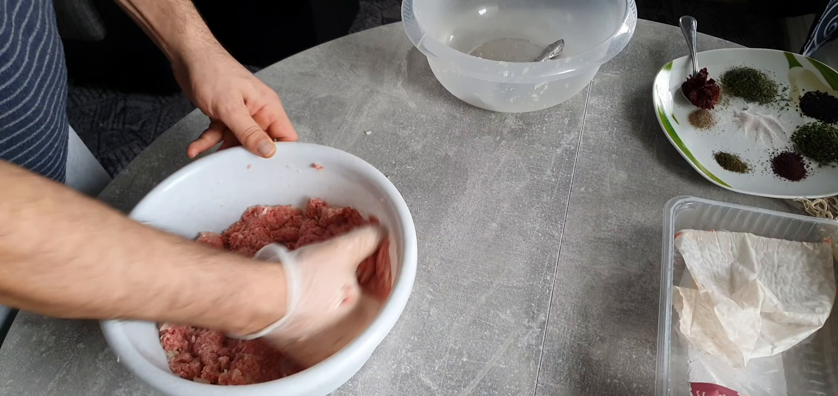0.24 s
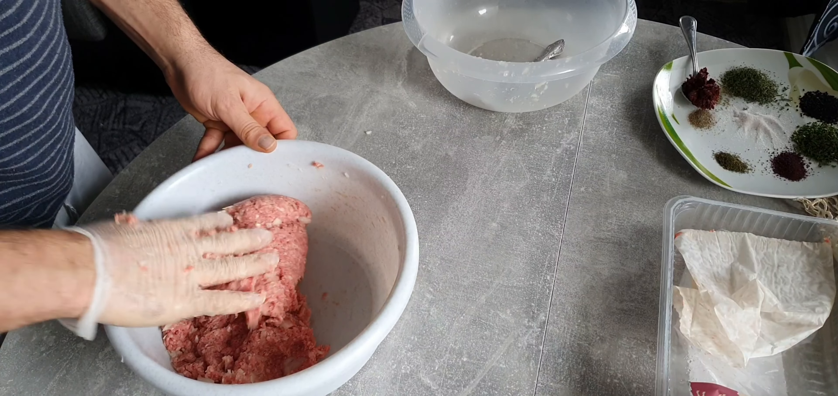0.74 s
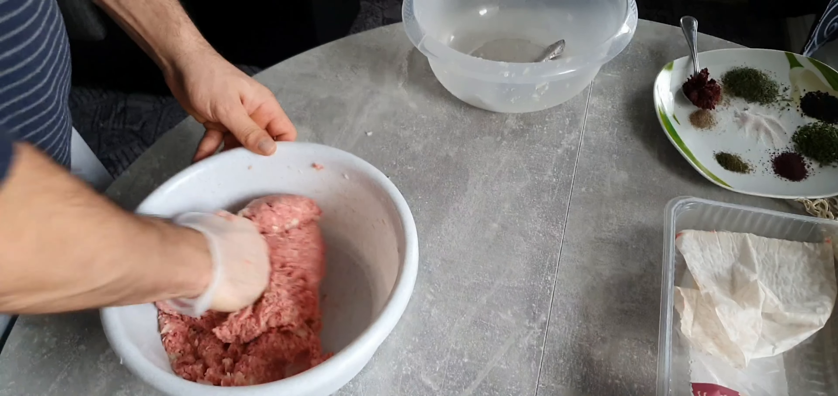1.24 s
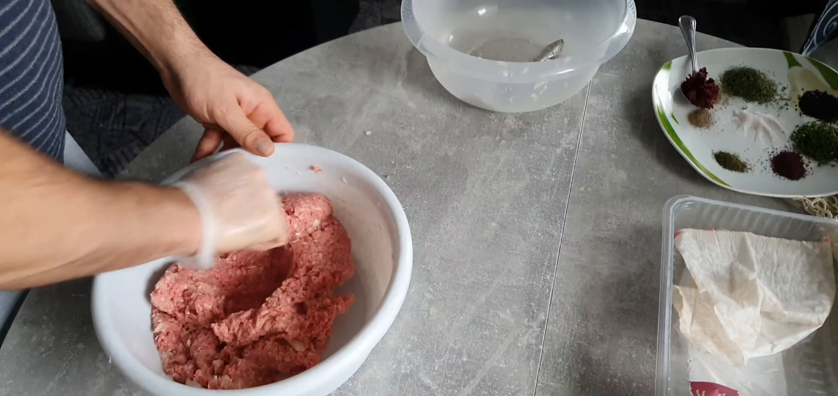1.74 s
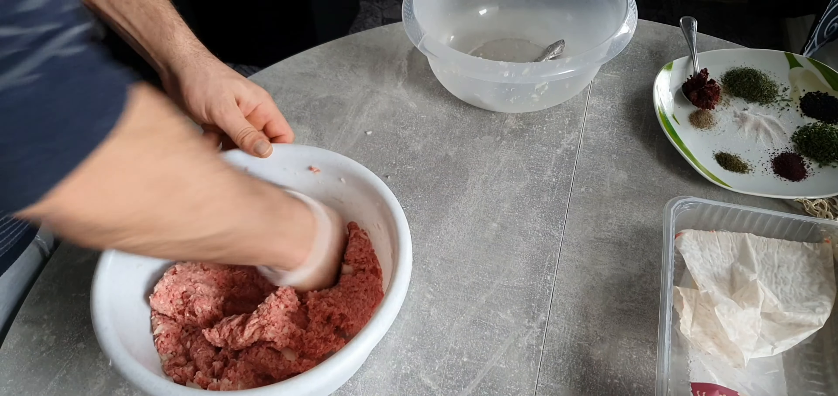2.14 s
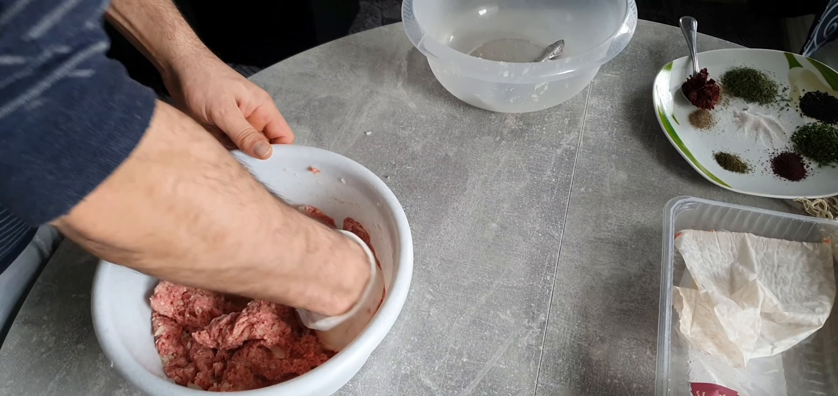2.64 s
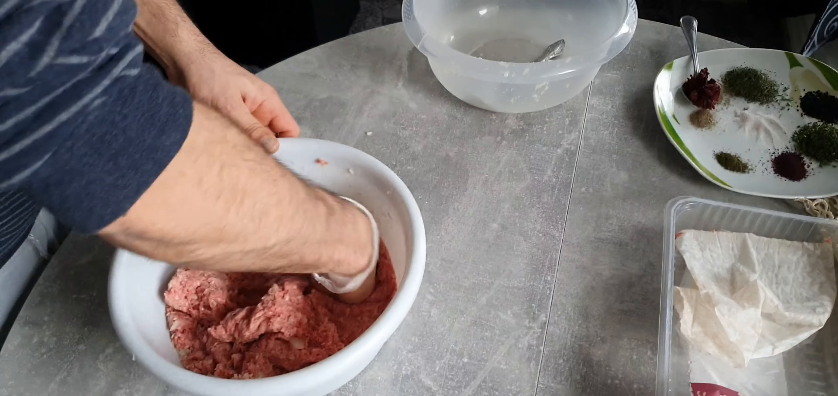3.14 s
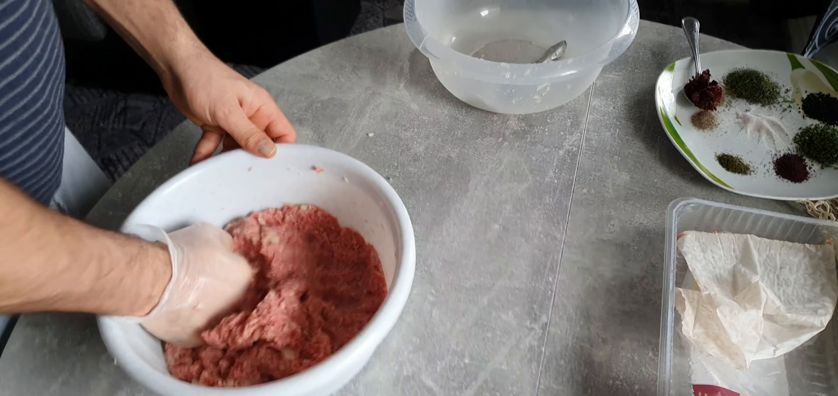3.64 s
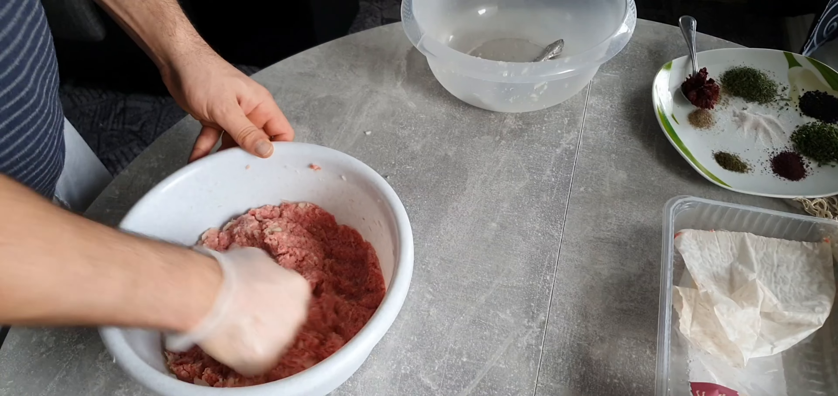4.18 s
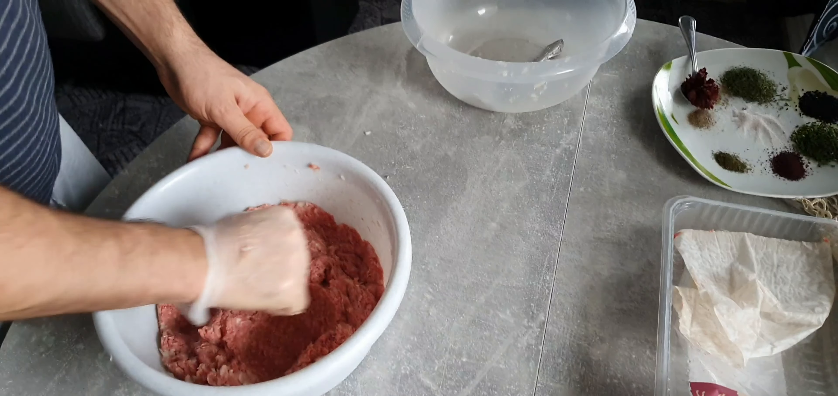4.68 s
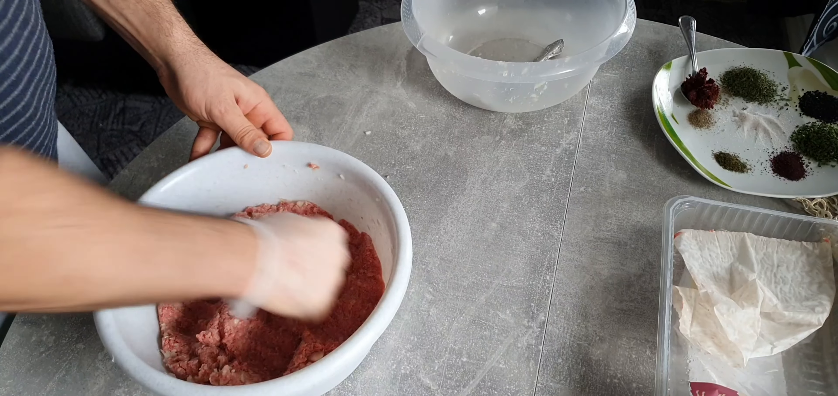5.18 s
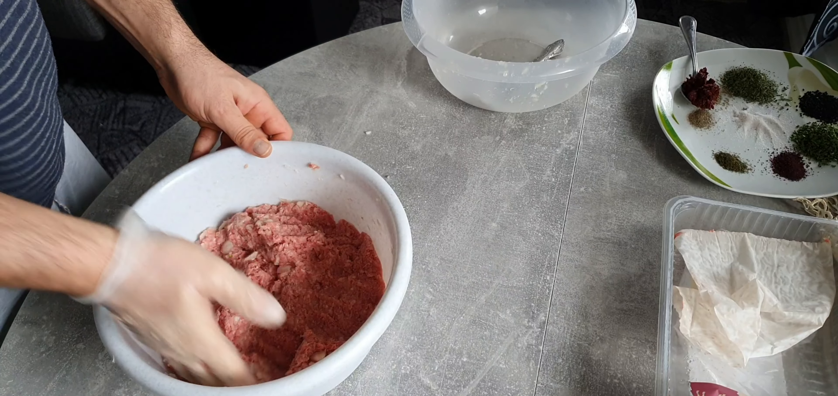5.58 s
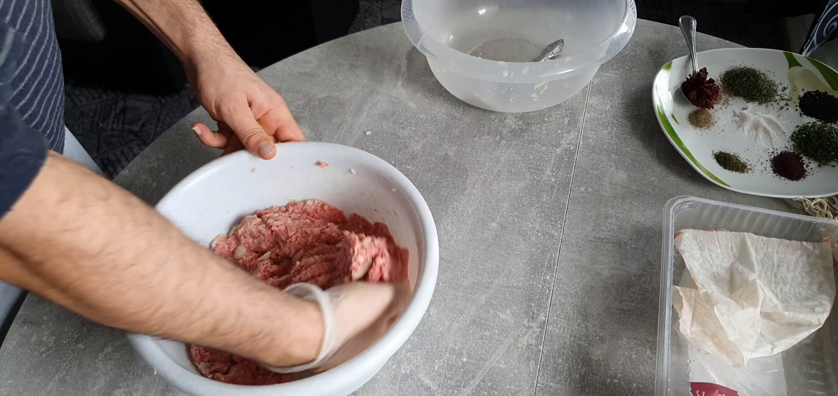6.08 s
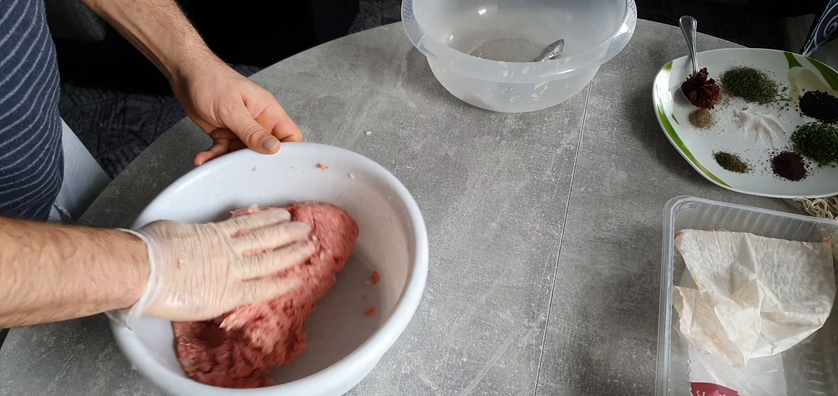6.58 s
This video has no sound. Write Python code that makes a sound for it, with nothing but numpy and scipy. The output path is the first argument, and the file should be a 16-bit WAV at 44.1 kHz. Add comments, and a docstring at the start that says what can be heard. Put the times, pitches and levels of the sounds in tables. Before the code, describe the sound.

A gloved hand kneads raw minced meat in a plastic bowl, wet squelches and sticky crackles broken by dull, boomy punches against the table.

```python
"""Kitchen table: a gloved hand kneads raw minced meat in a plastic bowl.
Scoops, peels and plunges gate three click textures (smear, squelch, glove crackle); scoops also scrape the wall.
Bursting pockets ring for about a cycle; punches excite bowl and table modes that boom.
Slaps are short dull noise; squirts are air puffs through a resonant gap. The arm rocks the table;
faint room noise runs throughout and a small kitchen rings briefly."""
import sys
import numpy as np
from scipy import signal
from scipy.fft import rfft, irfft, next_fast_len
from scipy.io import wavfile
from scipy.ndimage import uniform_filter1d

SR = 44100
rng = np.random.default_rng(int(sys.argv[2]) if len(sys.argv) > 2 else 0)


def transcribe(u):
    """Save the signal u as a 16-bit wav file named by the first command-line argument.

    u: samples, shape (n,) or (channels, n), limited to [-1, 1]; the rate is SR.
    q: integer samples, one column per channel.
    """
    v = np.clip(np.atleast_2d(u).T, -1, 1)
    q = np.round(v * 32767).astype(np.int16)
    wavfile.write(sys.argv[1], SR, q)


N = 300762
TIME = np.arange(N) / SR
TOP_HZ = 15700
SIDES = np.array([[1], [-1]])  # opposite motion, left and right


def undb(db):
    """Decibels to gain."""
    return 10 ** (np.asarray(db) / 20)


def unit(x):
    """Scale to an rms of 1."""
    return x / np.sqrt(np.mean(x ** 2))


def add(track, start_s, sound):
    """Mix a sound into a track at a time."""
    start = max(int(start_s * SR), 0)
    track[start:start + len(sound)] += sound[:N - start]


def on_log_axis(points, hz):
    """Read (Hz, value) points at any frequency."""
    known_hz, values = np.transpose(points)
    return np.interp(np.log(hz + 1), np.log(known_hz), values)


def colour(x, points):
    """Minimum-phase filter with the given spectrum; white noise keeps its power."""
    size = next_fast_len(2 * N)
    size += size % 2
    gain = unit(undb(on_log_axis(points, np.fft.rfftfreq(size, 1 / SR))))
    cepstrum = irfft(np.log(gain))
    # fold onto positive time: causal
    cepstrum[1:size // 2] *= 2
    cepstrum[size // 2 + 1:] = 0
    response = np.exp(rfft(cepstrum))
    return irfft(rfft(x, size) * response)[..., :N]


def resonate(x, hz, q):
    """One resonance with a gain of 1 at its centre."""
    hz = min(hz, TOP_HZ)
    b, a = signal.iirpeak(hz, max(q, hz / TOP_HZ), fs=SR)
    return signal.lfilter(b, a, x)


def walk(rate_hz):
    """Smooth random wandering with a spread near 1."""
    return 1.2 * np.interp(TIME * rate_hz, np.arange(1000), rng.standard_normal(1000))


def clicks(rate_hz, spread_db):
    """Random clicks of uneven size and random sign, levelled to an rms near 1 over about 0.11 s."""
    chance = rng.random(N)
    size = np.minimum(rng.exponential(size=N), 5)
    train = (chance < rate_hz / SR) * undb(spread_db * size) * rng.choice([-1, 1], N)
    return train / np.sqrt(np.abs(uniform_filter1d(train ** 2, size=5000)) + 1e-9)


def crackle(rate_hz, spread_db, q, snap_share, patchy_db):
    """Tiny films break: most ring a cavity, some only snap; each cavity's level wanders as the meat deforms."""
    rings = np.zeros(N)
    for hz in np.geomspace(550, 14000, 18):
        level = undb(patchy_db * walk(rate_hz=28))
        breaks = clicks(rate_hz * np.sqrt(hz / TOP_HZ), spread_db)
        rings += level * resonate(breaks, hz, q)
    return unit(unit(rings) + snap_share * clicks(rate_hz, spread_db))


def stroke(start_s, rise_s, hold_s, sag_db_per_s, rest_db=-25, release_db_per_s=255):
    """Gain of one movement: swell from rest, slackening hold, release when the hand stops."""
    t = TIME - start_s
    swell_db = rest_db * np.clip(1 - t / rise_s, 0, None) ** 2
    sag_db = sag_db_per_s * np.maximum(t - rise_s, 0)
    release_db = release_db_per_s * np.maximum(t - rise_s - hold_s, 0)
    return (t >= 0) * undb(np.maximum(swell_db - sag_db - release_db, -120))


# hand scoops meat along the bowl wall: start t/s, rise t/s, hold t/s, relative level/dB
SCOOP_STROKES = [(0.0, 0.005, 0.24, -48), (0.223, 0.062, 0.32, -56.5), (3.557, 0.027, 0.23, -50),
                 (5.54, 0.24, 0.23, -51.5), (5.944, 0.04, 0.17, -60), (6.168, 0.087, 0.045, -55.5),
                 (6.521, 0.088, 0.041, -55)]


def scoops(smear_db=-5, glove_db=-6, scrape_db=-7, sag_db_per_s=20.5):
    """Power of smear, squelch, glove and scrape: scooping alone scrapes the wall."""
    power = np.zeros((4, N))
    for start_s, rise_s, hold_s, db in SCOOP_STROKES:
        mix = undb(db + np.array([smear_db, 0, glove_db, scrape_db]))
        power += np.outer(mix, stroke(start_s, rise_s, hold_s, sag_db_per_s)) ** 2
    return power


# sticky glove peels off: start t/s, rise t/s, hold t/s, relative level/dB, glove crackle re that/dB
PEEL_STROKES = [(0.033, 0.076, 0.028, -53, 6), (0.247, 0.31, 0.22, -66, 7.5), (1.243, .12, 0.078, -55, 5),
                (1.482, 0.047, 0.064, -62, -5), (1.783, 0.13, 0.15, -52, -3),
                (2.122, 0.026, 0.066, -52, -1.5), (2.7, 0.021, 0.028, -54, -1),
                (3.287, 0.041, 0.042, -58, 2.5), (3.583, 0.059, 0.14, -60.5, 10.5),
                (3.915, 0.043, 0.021, -44.5, -11), (4.148, 0.13, 0.15, -59, 1),
                (4.468, 0.11, 0.044, -64.5, 3), (4.918, 0.026, 0.014, -63, 8.5),
                (5.069, 0.068, 0.062, -56.5, -0.5), (5.574, 0.016, 0.26, -69.5, 8.5),
                (6.312, 0.17, 0.43, -64.5, 6)]


def peels(smear_db=-15, sag_db_per_s=29.5):
    """Power of smear, squelch, glove and scrape: peeling films crackle, with little smear."""
    power = np.zeros((4, N))
    for start_s, rise_s, hold_s, db, crackle_db in PEEL_STROKES:
        mix = undb(db + np.array([smear_db, 0, crackle_db]))
        power[:3] += np.outer(mix, stroke(start_s, rise_s, hold_s, sag_db_per_s)) ** 2
    return power


# fist sinks into the meat: start t/s, rise t/s, hold t/s, relative level/dB, wetness re that/dB
PLUNGE_STROKES = [(1.108, 0.09, 0.28, -50, -2.5), (1.611, 0.024, 0.14, -43.5, -11.5),
                  (2.265, 0.013, 0.018, -62.5, -21), (2.391, 0.1, 0.11, -60.5, 7),
                  (2.754, 0.0091, 0.017, -63, 9.5), (2.997, 0.049, 0.14, -44.5, -3.5),
                  (3.573, 0.052, 0.17, -48, -7.5), (4.016, 0.01, 0.28, -51.5, -20),
                  (4.544, 0.047, 0.046, -46.5, -8.5), (4.792, 0.13, 0.027, -59.5, 4),
                  (5.278, .02, 0.042, -57, -3)]


def plunges(glove_db=-3, sag_db_per_s=77.5):
    """Power of smear, squelch, glove and scrape: displaced meat mostly smears; wetness adds crackle."""
    power = np.zeros((4, N))
    for start_s, rise_s, hold_s, db, wet_db in PLUNGE_STROKES:
        mix = undb(db + np.array([0, wet_db, wet_db + glove_db]))
        power[:3] += np.outer(mix, stroke(start_s, rise_s, hold_s, sag_db_per_s)) ** 2
    return power


# spectra of meat smear, wet squelch, glove crackle: f/Hz, relative level/dB
SMEAR_SPECTRUM = [(90, -26), (170, 1), (300, 7), (500, 2), (750, -5.5), (1200, -13), (3000, -46)]
SQUELCH_SPECTRUM = [(300, -12), (650, -8), (1100, 1), (1700, 2.5), (2700, 1), (4000, -1), (6000, -13.5),
                    (12000, -43)]
GLOVE_SPECTRUM = [(1500, -5), (3500, 0), (5500, 0), (6600, -3), (7700, -10), (10000, -5.5), (13000, -6),
                  (15500, -15.5)]


def kneading(settling_db=-83.5, scrape_hz=970, scrape_q=1.95):
    """Meat smears and squelches, the glove peels and the scraped wall rings, gated by the strokes."""
    power = scoops() + peels() + plunges()
    power[:3] += undb(settling_db) ** 2  # faint crackle between strokes
    slip_db = 1.35 * walk(rate_hz=70)  # glove sticks and lets go in quick jerks
    smear_gain, squelch_gain, glove_gain, scrape_gain = np.sqrt(power) * undb(slip_db)

    smear = colour(clicks(rate_hz=600, spread_db=3.5), SMEAR_SPECTRUM)
    squelch = crackle(rate_hz=380, spread_db=2.5, q=2.95, snap_share=1.0, patchy_db=2.0)
    squelch = undb(-2.55) * colour(squelch, SQUELCH_SPECTRUM)
    glove = crackle(rate_hz=970, spread_db=5.0, q=3.0, snap_share=2.2, patchy_db=9.0)
    glove = colour(glove, GLOVE_SPECTRUM)
    scrape = unit(resonate(clicks(rate_hz=350, spread_db=-1.0), scrape_hz, scrape_q))
    return smear * smear_gain + squelch * squelch_gain + glove * glove_gain + scrape * scrape_gain


# arm leans on the bowl: start t/s, rise t/s, hold t/s, relative level/dB
LEAN_STROKES = [(0.0, .02, 0.57, -51), (0.7, .03, 0.19, -56), (1.123, 0.032, 0.92, -45.5),
                (2.112, 0.18, 0.59, -48.5), (2.984, 0.032, 0.49, -49.5), (3.546, 0.064, 0.55, -42),
                (4.15, 0.054, 0.272, -49), (4.487, .08, 0.37, -51), (4.864, 0.049, 0.42, -52),
                (5.457, 0.28, 0.49, -54), (6.145, 0.17, 0.13, -69), (6.437, 0.076, 0.24, -60)]
# spectrum of the rocking table: f/Hz, relative level/dB
ROCKING_SPECTRUM = [(20, -33.5), (40, -14), (55, 0.5), (69, 1), (88, -9), (125, -13), (170, -25.5),
                    (300, -25.5), (700, -66)]


def pressing(sag_db_per_s=5.5, tilt_db=-6.5):
    """The leaning arm rocks the table in small slips; the two ends of the top swing partly apart."""
    weight = np.zeros(N)
    for start_s, rise_s, hold_s, db in LEAN_STROKES:
        lean = undb(db) * stroke(start_s, rise_s, hold_s, sag_db_per_s)
        weight = np.maximum(weight, lean)
    slips = np.array([clicks(rate_hz=400, spread_db=3.5) for _ in range(2)])
    heave, tilt = colour(slips, ROCKING_SPECTRUM)
    rock = heave + undb(tilt_db) * tilt * SIDES
    # the arm leans steadily: level over about 0.09 s
    rock /= np.sqrt(uniform_filter1d(np.mean(rock ** 2, axis=0), size=4000) + 1e-6)
    return rock * weight


# room noise spectrum: f/Hz, relative level/dB
ROOM_TONE_SPECTRUM = [(20, 5.5), (100, 2), (160, -3), (260, -6), (400, -14.5), (700, -22), (2400, -26),
                      (5000, -42.5), (15000, -61)]


def room_tone(level_db=-77):
    """Faint steady noise of the kitchen, independent left and right."""
    return undb(level_db) * colour(rng.standard_normal((2, N)), ROOM_TONE_SPECTRUM)


# bursting air pockets: t/s, relative ring level/dB, f/Hz, relative snap level/dB
POCKET_BURSTS = [(0.0104, -34.5, 2380, -81), (0.2141, -33.5, 1260, -79), (0.4401, -26.5, 2290, -62),
                 (1.1627, -52, 940, -43.5), (1.388, -46.5, 5070, -48.5), (1.5646, -41, 2350, -42),
                 (1.6429, -24, 1005, -49), (2.16, -42, 1530, -57), (2.7212, -47, 4560, -46),
                 (3.0487, -23.5, 2310, -44.5), (3.0587, -31, 1550, -43), (3.1177, -46, 1430, -46),
                 (3.3191, -47, 1620, -52.5), (3.358, -26, 3160, -48), (3.9976, -30, 1820, -42.5),
                 (4.0418, -27.5, 1570, -61), (4.5672, -37.5, 1400, -49.5), (4.9695, -49, 4100, -45.5),
                 (5.9132, -36, 1200, -50.5), (6.2853, -44, 1970, -57), (6.388, -47, 1110, -64),
                 (6.6989, -41.5, 2120, -63)]
# spectrum of a snapping film: f/Hz, relative level/dB
SNAP_SPECTRUM = [(300, 5), (900, -13), (3000, 6), (6500, 1), (13000, -14), (15500, -24)]


def pops(cycles=1.0, snap_s=0.00083):
    """A film snaps and the opening pocket rings for about one cycle."""
    rings, snaps = np.zeros((2, N))
    t = TIME[:SR // 20]
    for start_s, db, hz, snap_db in POCKET_BURSTS:
        ring = np.exp(-t * hz / cycles) * np.sin(2 * np.pi * hz * t)
        add(rings, start_s, undb(db + 2.0) * ring)
        snap = np.exp(-t / snap_s) * rng.standard_normal(len(t))
        add(snaps, start_s, undb(snap_db + 13) * snap)
    return rings + colour(snaps, SNAP_SPECTRUM)


# punches that reach the table: t/s, relative level/dB, contact time constant/ms
TABLE_PUNCHES = [(0.023, -39.5, 0.56), (0.731, -32.5, 4.4), (.757, -24, 5.8), (0.884, -44.5, 4.5),
                 (1.163, -32.5, 0.62), (1.644, -25, 0.6), (2.49, -32.5, 1), (3.019, -40.5, 0.37),
                 (3.058, -24, 0.85), (3.576, -35.5, 0.9), (4.042, -35, 0.55), (4.587, -28.5, 1.16),
                 (4.888, -27.5, 1.23), (5.293, -66, 1.3)]
# modes of loaded bowl on table: nominal f/Hz, nominal level/dB, t60/s
BOWL_TABLE_MODES = [(52, -10.5, 0.61), (65.77, 2.5, 0.33), (115.5, -2.5, 0.27), (127.5, -1, 0.52),
                    (160, -8.5, 0.54), (208.8, -14.5, 0.49), (253.4, -3, 0.19), (293, 1.5, 0.27),
                    (371, -6, 0.42), (487, -9.5, 0.066), (558, -7.5, 0.32), (689, -7, 0.3), (760, -32, .13),
                    (1010, -14, .1)]


def punches(table_hz=90, place_db=2.0, detune=0.037):
    """The meat cushions each blow: the longer the contact, the fewer high modes ring."""
    out, t = np.zeros(N), TIME[:SR // 2]
    hz, mode_db, t60_s = np.transpose(BOWL_TABLE_MODES)
    signs = np.where(hz < table_hz, -1, 1)  # table sags while the bowl rebounds
    loading = np.minimum(hz / 300, 1)  # the lump shifts wall modes more than table modes
    for start_s, db, contact_ms in TABLE_PUNCHES:
        place, load = loading * rng.standard_normal((2, len(hz)))
        gains = signs * undb(mode_db + place_db * place)
        gains *= np.where(hz > 180, rng.choice([-1, 1], len(hz)), 1)  # wall swings either way
        poles = 2j * np.pi * hz * (1 + detune * load) - np.log(1000) / t60_s
        ring = gains @ np.exp(np.outer(poles, t)).imag
        push = t * np.exp(-t * 1000 / contact_ms)
        blow = signal.fftconvolve(ring, push / push.sum())[:len(t)]
        add(out, start_s, undb(db) * blow)
    return out


# wet slaps of meat on the bowl wall: t/s, relative level/dB
WALL_SLAPS = [(1.162, -30.5), (1.642, -23.5), (3.014, -39.5), (3.058, -26), (3.576, -36), (4.039, -30),
              (4.588, -30.5), (5.291, -46)]
# slap spectrum: f/Hz, relative level/dB
SLAP_SPECTRUM = [(100, -29), (280, 5.5), (600, 2), (1100, -6), (2500, -8), (6000, -17), (15000, -58)]


def slaps(decay_s=0.0085):
    """Meat lands flat on the plastic: a short, dull splat of decaying noise."""
    out, t = np.zeros(N), TIME[:SR // 10]
    for start_s, db in WALL_SLAPS:
        splat = np.exp(-t / decay_s) * rng.standard_normal(len(t))
        add(out, start_s, undb(db - 5.0) * splat)
    return colour(out, SLAP_SPECTRUM)


# air squeezed from under the fist: start t/s, length t/s, relative level/dB, gap f/Hz, spray re gap/dB
AIR_SQUIRTS = [(1.563, 0.022, -39, 2700, 2.5), (1.583, 0.034, -30.5, 2730, -14.5),
               (1.607, 0.019, -44, 3050, -20), (3.954, 0.012, -41, 1610, -28),
               (3.991, 0.0094, -45.5, 3060, -5), (4.565, 0.009, -42, 1380, -16),
               (5.121, 0.017, -58, 1610, -24)]


def squirts(flutter_hz=600, gap_q=1.8, spray_hz=10200, hollow_hz=1100):
    """Air sputters through a wet gap in quick, uneven puffs that ring the gap and spray."""
    out = np.zeros(N)
    puffs = clicks(flutter_hz, spread_db=7.0) + 0.92 * rng.standard_normal(N)
    for start_s, length_s, db, gap_hz, spray_db in AIR_SQUIRTS:
        air = puffs[int(start_s * SR):int((start_s + length_s) * SR)]
        gap = unit(resonate(air, gap_hz, gap_q))
        spray = undb(spray_db) * unit(resonate(air, spray_hz, q=1.7))
        hollow = undb(-12.0) * unit(resonate(air, hollow_hz, q=1.9))  # under the fist
        window = signal.windows.tukey(len(air), .2)
        add(out, start_s, undb(db) * (gap + spray + hollow) * window)
    return out


# kitchen decay: f/Hz, t60/s
KITCHEN_DECAY = [(100, 0.58), (700, 0.27), (2000, 0.35), (5000, 0.2), (14000, 0.22)]


def echoes(early_db=-3, early_s=.006, onset_s=.004):
    """Left and right response of the kitchen: bowl and table answer first, the walls later."""
    t = TIME[:2 ** 14]
    hz = np.fft.rfftfreq(len(t), 1 / SR)
    centres_hz = np.geomspace(100, 12800, 5)
    # f/Hz, relative level/dB: the boom stays mostly direct
    share_db = [(70, -14.5), (280, -8.5), (600, -1.5), (2000, -1.5), (12000, 3.0)]
    noise = undb(on_log_axis(share_db, hz)) * rfft(rng.standard_normal((2, len(t))))
    tail = 0
    for centre_hz, weights in zip(centres_hz, np.eye(len(centres_hz))):
        band = irfft(noise * np.interp(hz, centres_hz, weights), len(t))
        tail = tail + band * np.exp(-np.log(1000) * t / on_log_axis(KITCHEN_DECAY, centre_hz))
    tail = tail * (1 + undb(early_db) * np.exp(-t / early_s)) * np.minimum(t / onset_s, 1)
    return unit(tail) / np.sqrt(len(t))


def kitchen(x, count=90):
    """The arm moves over the bowl, so the reflection pattern keeps changing: crossfaded responses."""
    out = np.zeros((2, N))
    hop = N // count
    fade = np.sqrt(signal.windows.hann(2 * hop, sym=False))
    padded = np.pad(x, (0, 2 * hop))
    for start in range(0, N, hop):
        part = fade * padded[start:start + 2 * hop]
        for side, response in zip(out, echoes()):
            add(side, start / SR, signal.fftconvolve(part, response))
    return out


def scene(lag_s=0.00011, pan_db=0.77, tilt_hz=65):
    """The bowl stands a little to the left, so the right side hears it slightly later and softer."""
    blows = punches()
    inside = kneading() + blows + squirts()
    surface = slaps() + pops()
    near = inside + undb(4) * surface  # the bowl wall does not shade the surface
    delay = np.exp(-2j * np.pi * np.fft.rfftfreq(N, 1 / SR) * lag_s)
    late = irfft(rfft(near) * delay, N)
    direct = np.array([near * undb(pan_db), late * undb(-pan_db)])
    # under a blow the top also tilts, lagging its lowest swing: one side rises as the other sinks
    lowpass = signal.butter(2, tilt_hz, fs=SR, output="sos")
    tilt = signal.sosfilt(lowpass, blows) * SIDES
    room = kitchen(inside + surface)
    return undb(-2.34) * direct + undb(-3) * tilt + room + pressing() + room_tone()


def record(dry):
    """Steep elliptic low-pass at TOP_HZ: cuts the extreme treble."""
    lowpass = signal.ellip(8, .2, 70, TOP_HZ, fs=SR, output="sos")
    return signal.sosfilt(lowpass, dry)


dry = scene()
out = record(dry)
transcribe(out)
```